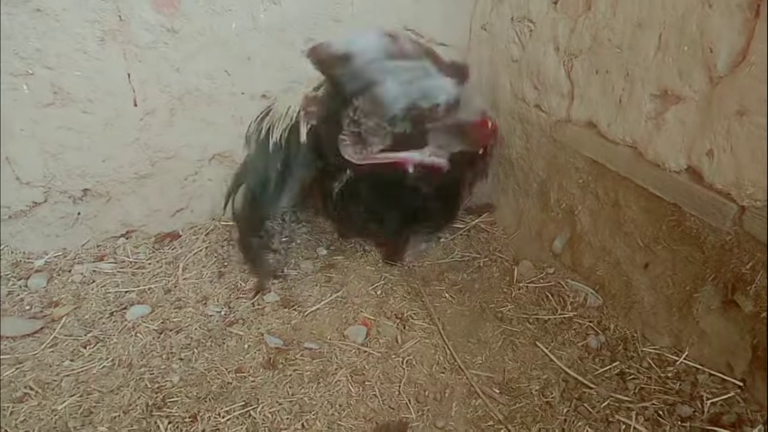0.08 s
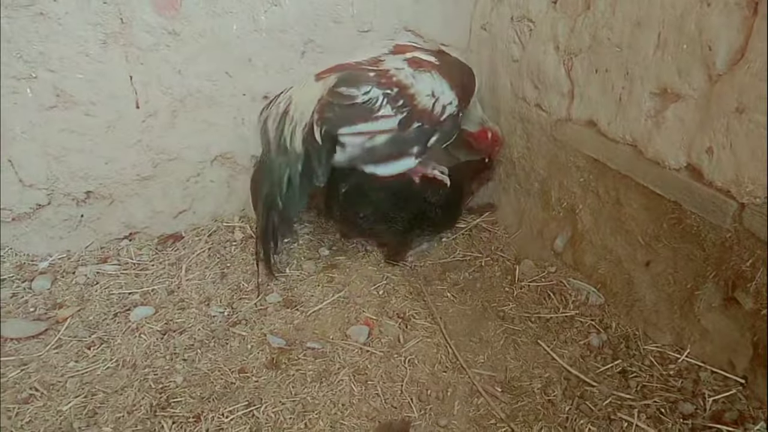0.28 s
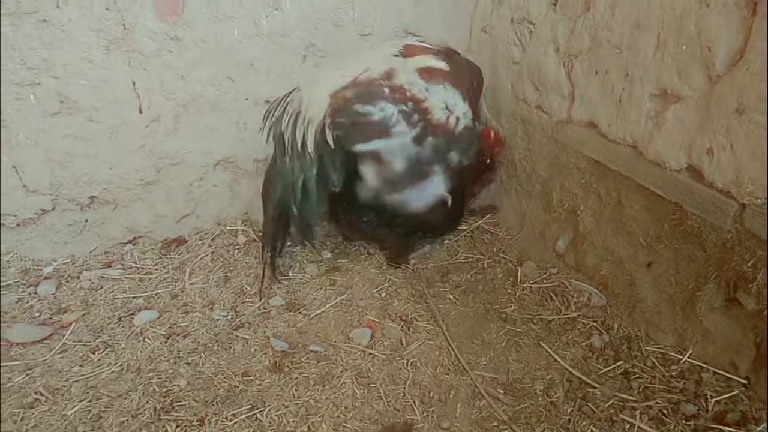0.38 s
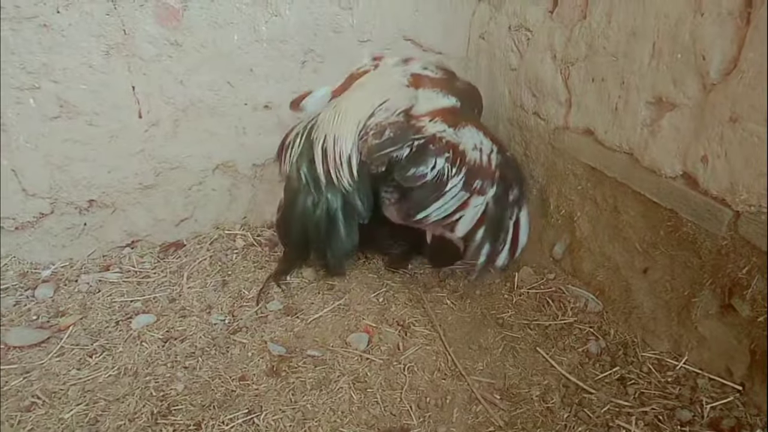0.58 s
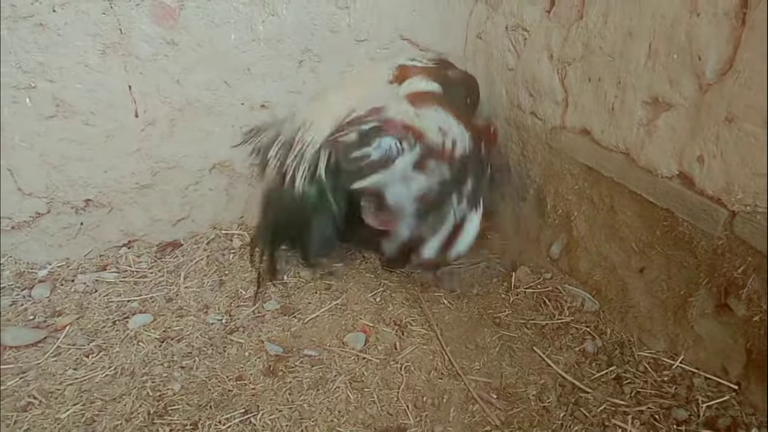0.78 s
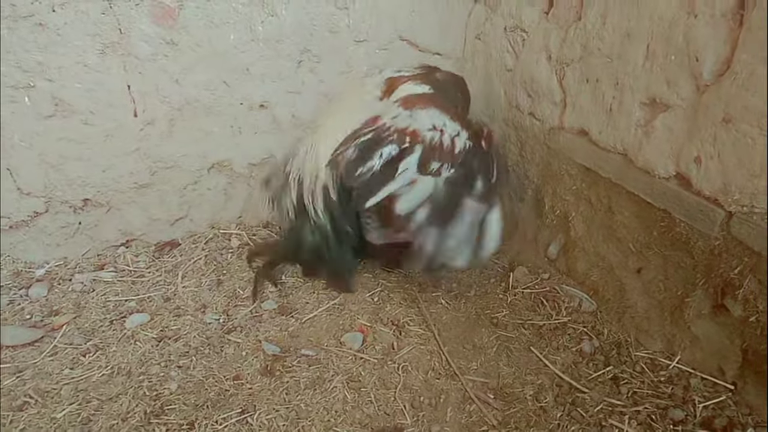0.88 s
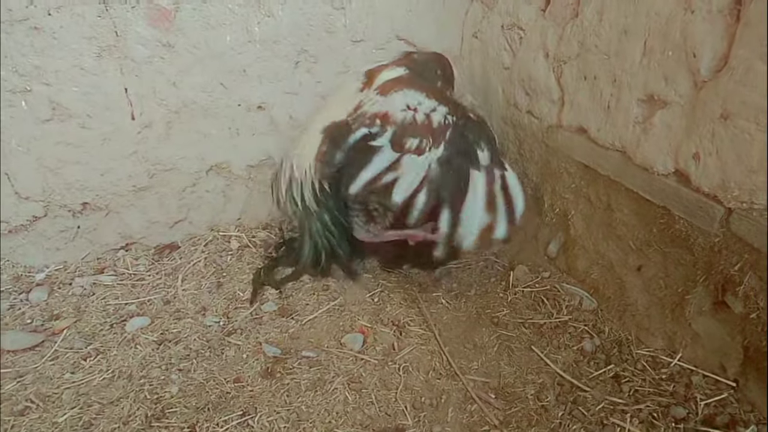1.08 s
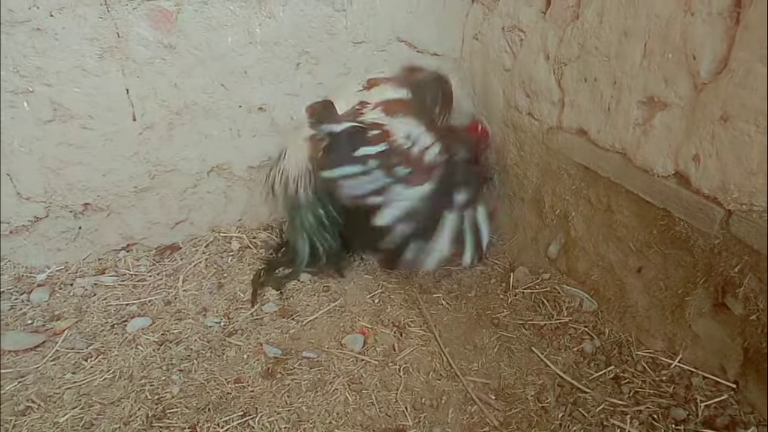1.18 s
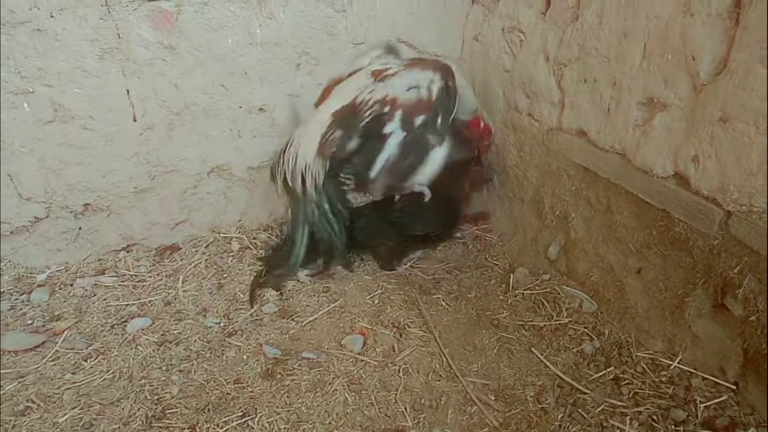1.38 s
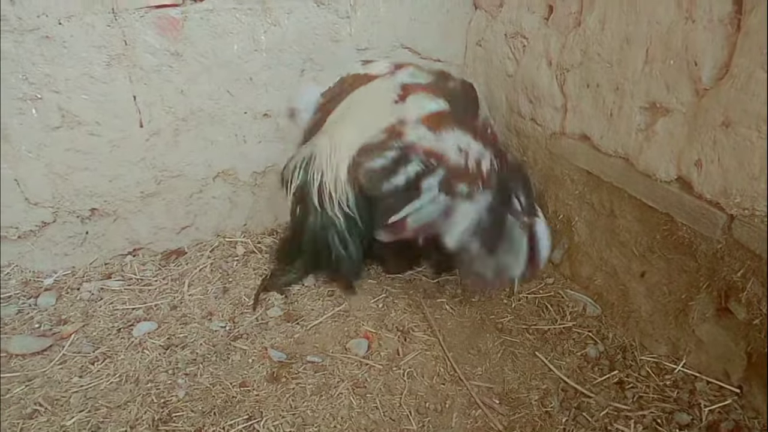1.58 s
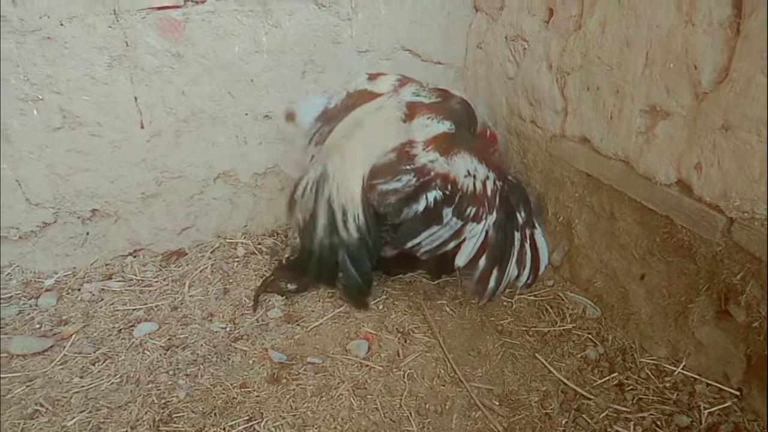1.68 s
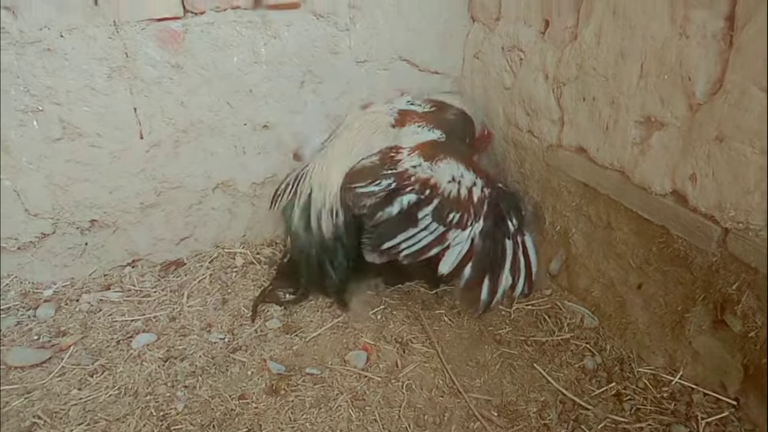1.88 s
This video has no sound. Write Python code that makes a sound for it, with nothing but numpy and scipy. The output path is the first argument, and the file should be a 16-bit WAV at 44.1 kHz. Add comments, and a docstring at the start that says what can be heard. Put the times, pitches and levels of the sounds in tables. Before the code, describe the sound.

A hen squawks three times, loud and hoarse, over scuffling wings and rustling feathers.

```python
"""A faint rustle and twitter, then three loud squawks from a hen pinned by a rooster in a pen's corner.
The membranes of her syrinx sing through her throat, cracking between clear and hoarse as a
second, lower pitch and puffs of breath join in. His wings push air and scrape over straw and wall,
feathers rub and tick, and a small bird whistles further off. The walls add a short reverb."""
import sys
import numpy as np
from scipy import signal
from scipy.fft import rfft, irfft
from scipy.io import wavfile
from scipy.ndimage import uniform_filter1d

SR = 44100
rng = np.random.default_rng(int(sys.argv[2]) if len(sys.argv) > 2 else 0)


def to_wav(s):
    """Save 16-bit WAV."""
    ch = np.atleast_2d(s).T  # columns
    pcm = np.round(np.clip(ch, -1, 1) * 32767)  # PCM
    wavfile.write(sys.argv[1], SR, pcm.astype(np.int16))


N = 83790

# the squawks: t/s, pitch/Hz, fundamental level/dB, overtone level/dB, treble level/dB, roughness/0-1
SQUAWK_1 = [(.188, 620, -54.5, -60.5, -80, 0.45), (.215, 658, -33.5, -35, -46, 0.3),
            (.228, 696, -31, -54.5, -49, 0.47), (.248, 793.5, -30.5, -32.5, -52, 0.71),
            (.28, 837, -36.5, -32.5, -40, 0.46), (.308, 819, -35.5, -28, -41, 0),
            (.334, 835.7, -39, -34.5, -40.5, 0.22), (.36, 809.3, -34.5, -26, -47, 0),
            (.384, 805, -41.5, -30, -51, 0.15), (.406, 808.7, -31, -35.5, -44, 0.9),
            (.45, 788, -67.5, -49, -56.5, 0.9), (.51, 782, -61, -65, -60, 0)]
SQUAWK_2 = [(0.524, 690, -43.5, -42.5, -52.5, 0.2), (0.559, 744.2, -22.5, -39, -44.5, 0.1),
            (0.574, 887.5, -47, -33.5, -44.5, 0.54), (0.601, 912, -42, -34.5, -40.5, 0.19),
            (0.644, 835, -27.5, -35, -41.5, 0.79), (0.673, 805.7, -38, -47, -48, 0.96),
            (0.696, 706.8, -41.5, -32, -48, 0.23), (0.735, 725.6, -24.5, -39, -41, 0.12),
            (0.762, 745, -23, -38.5, -50, 0.063), (0.781, 857.2, -41, -33, -31, 0.46),
            (.808, 888.8, -36.5, -32.5, -35.5, 0.1), (0.873, 888.6, -31.5, -32, -34.5, 0.26),
            (0.941, 870.3, -36.5, -36, -33, 0.1), (0.999, 848, -36, -27.5, -25, 0.13),
            (1.034, 835.6, -43.5, -35, -48.5, 0.34), (1.043, 758.6, -36, -26.5, -61, 0.56),
            (1.084, 770, -60, -44.5, -52.5, 0.7), (1.141, 796, -44, -61, -72, 0.66)]
SQUAWK_3 = [(1.135, 618, -61, -45, -53, 0.22), (1.187, 676.8, -38, -35, -47.5, 0.86),
            (1.227, 762, -33, -36, -45, 0.91), (1.283, 810, -34, -33, -45.5, 0.54),
            (1.329, 796.3, -26.5, -33, -46, 0.058), (1.378, 779.5, -31.5, -33.5, -56, 0.03),
            (1.401, 727.2, -30.5, -42.5, -53.5, 0.03), (1.477, 715.6, -32.5, -35.5, -59, 0.02),
            (1.496, 678, -31.5, -40, -45, 0.025), (1.52, 674.4, -27, -42.5, -50, 0.025),
            (1.536, 634, -38, -38, -63, 0.05), (1.634, 557.6, -45, -39, -53, 0.11),
            (1.779, 497.4, -64, -65, -82, 0.45)]
# cracks in the voice, where the pitch jumps: t/s
CRACKS = [.563, .772, 1.388, 1.487, 1.523]
# throat colour of the clear voice and of the hoarse breath: f/Hz, level/dB
THROAT_EQ = [(450, 5), (750, -15), (1150, 5), (1420, 8.5), (1680, 10), (1950, 4.5), (2300, 11),
             (2650, -1.5), (3100, -8.5), (3480, 2), (3750, -10.5), (4300, -25.5), (5300, -25.5),
             (7000, -30), (8300, -36.5), (10000, -28.5), (12000, -46), (15000, -37.5)]
RASP_EQ = [(200, -62.5), (420, -15), (720, 15), (1000, -14), (1250, -9.5), (1650, -0.5), (2000, -7),
           (2330, 0.5), (3000, -7.5), (3470, 28), (3850, -46), (6200, -1.5), (8000, -27), (15000, -64)]
# weight of the roughness in the fundamental, overtones and treble
RASP_SHARE = [0.45, 1.0, 1.11]
# which overtone rings most at each moment: t/s, f/Hz
RINGING_OVERTONE = [(.22, 1940), (.26, 1577), (.62, 1570), (.72, 1443), (.81, 1930), (1.01, 1720),
                    (1.045, 2330), (1.26, 2230), (1.35, 1505), (1.46, 1503), (1.5, 2124), (1.58, 1757),
                    (1.7, 1643)]
# overtones flare as the beak opening tunes in on them: t/s, half-width/s, f/Hz, boost/dB
BEAK_FLARES = [(0.345, 0.17, 7030, 10.5), (0.61, 0.053, 9450, 11.5), (0.844, 0.078, 5346, 10.5),
               (1, 0.041, 3400, 10), (1.515, 0.018, 3370, 6), (1.617, 0.032, 2348, 18)]
# slapback off the wall: delay/s, level/dB
SLAPBACK = [(.0175, -12)]
# wing pushes of air: t/s, half-width/s, level/dB
PUSHES = [(.01, 0.072, -54), (0.882, 0.0088, -44.5), (1.2, 0.038, -56.5), (1.456, 0.049, -45)]
# wing scrapes: t/s, length/s, level/dB
SCRAPES = [(0.938, 0.092, -33), (1.019, 0.048, -43), (1.292, .04, -32)]
# fader curve of the feather rustle: t/s, level/dB
RUSTLE_FADER = [(0, -50), (.17, -63.5), (.3, -63.5), (.46, -63.5), (.57, -54.5), (.74, -51), (.86, -52.5),
                (1.07, -61), (1.18, -53.5), (1.51, -53), (1.75, -61.5)]
# quill flicks: t/s, level/dB
FLICKS = [(.546, -55), (.829, -53), (.865, -48), (1.492, -54), (1.639, -55)]
# small bird's notes: t/s, length/s, start f/Hz, end f/Hz, level/dB, buzz/0-1
TWEETS = [(0.036, 0.009, 5660, 5100, -50.5, .4), (0.048, 0.064, 2330, 3600, -64, 0),
          (.1, 0.018, 3190, 4280, -52, 0.35), (1.242, 0.033, 5600, 5200, -51.5, 0.52),
          (1.516, 0.13, 5300, 4660, -56, 1), (1.785, 0.031, 5500, 5400, -53, 0.8),
          (1.818, 0.05, 2470, 3820, -58.5, 0.16)]
# colours of the pushes, scrapes, rustle, flicks and still air: f/Hz, level/dB
PUSH_EQ = [(25, -39), (60, -14), (150, 4.5), (310, -1.5), (520, -8.5), (4000, -65)]
SCRAPE_EQ = [(100, -32), (220, -15), (330, -4), (1200, 2.5), (2700, -11.5), (4500, -11), (6000, -17),
             (7300, -36.5), (8500, -22.5), (10000, -58)]
RUSTLE_EQ = [(200, -2), (1000, -5), (5800, 8), (7400, -6.5), (10500, -4.5), (14000, 3.5)]
FLICK_EQ = [(3000, -16), (14000, -11)]
AIR_EQ = [(30, -39), (62, 7.5), (200, -5), (500, -9.5), (5500, -14.5), (7500, -73.5), (15500, -42)]
# reverb time of the pen: f/Hz, t60/s
PEN_DECAY = [(100, 0.17), (2500, 0.31), (15000, 0.055)]

TIME = np.arange(N) / SR
EASE_SAMPLES = int(.009 * SR)  # smoothing of the voice's controls


def squawk(rows):
    """One side of the syrinx sings; with hoarseness the other side and puffs of breath join in."""
    start = rows[0][0]
    t = np.arange(start, rows[-1][0], 1 / SR)
    n = len(t)
    _, *levels, rough = uniform_filter1d(follow(rows, t), EASE_SAMPLES, axis=1, mode="nearest")
    hz, rough = cracking_pitch(rows, t), np.clip(rough, 0, .95)
    upper_side, lower_side = membrane(t, hz, rough), membrane(t, hz * .97, rough)
    lower_share = np.clip(rough ** 1.5, 0, .8)
    cycle = np.cumsum(hz) / SR % 1
    puffs = rfft(rng.standard_normal(N)[:n] * (.36 + np.exp(-cycle / .04)))  # one puff a cycle
    bins, voice = np.fft.rfftfreq(n, 1 / SR), 0
    for upper, lower, band, db, share in zip(upper_side, lower_side, registers(bins), levels, RASP_SHARE):
        tone = crossfade(upper, lower, lower_share)
        breath = unit_rms(irfft(puffs * band * amp(eq_at(RASP_EQ, bins)), n))
        hoarse = np.clip(rough * share, 0, 1)
        shimmer = 1 + (.05 + .16 * rough) * wander(n, rate_hz=93)
        voice += amp(db) * shimmer * crossfade(tone, breath, hoarse)
    return start, voice * tremor(t) * signal.windows.tukey(n, .03)


def membrane(t, hz, rough, ring_db=15, ring_width_hz=84, flare_width=.09):
    """A membrane's harmonics by register, coloured by throat and beak; one overtone rings out."""
    jitter = (.0015 + .02765 * rough) * wander(len(hz), rate_hz=150)
    cycles = np.cumsum(hz * (1 + jitter)) / SR
    k = np.arange(1, 20)[:, None]
    partial_hz = k * hz
    partials = np.cos(2 * np.pi * (k * cycles + rng.random(k.shape)))
    flutter_db = (1.5 + 5 * rough) * (k > 1)
    partials *= amp(flutter_db * flutter(t, count=len(k)))
    ring = ring_db * np.exp(-((partial_hz - follow(RINGING_OVERTONE, t)[0]) / ring_width_hz) ** 2)
    flare = sum(db * np.exp(-((t - s) / width) ** 2 - ((partial_hz / f - 1) / flare_width) ** 2)
                for s, width, f, db in BEAK_FLARES)
    colour = amp(eq_at(THROAT_EQ, partial_hz) + ring + flare)
    weights = [band * colour for band in registers(partial_hz)]
    return [(w * partials).sum(0) / np.sqrt((w ** 2).sum(0) / 2 + 1e-12) for w in weights]


def cracking_pitch(rows, t):
    """The pitch glides from point to point, but holds and jumps across a crack."""
    s, pitch = np.transpose(rows)[:2]
    hz, segment = np.interp(t, s, pitch), np.searchsorted(s, t)
    for at in CRACKS:
        i = np.searchsorted(s, at)
        if 0 < i < len(s):
            hz = np.where(segment == i, np.where(t < at, pitch[i - 1], pitch[i]), hz)
    return uniform_filter1d(hz, EASE_SAMPLES, mode="nearest")


def flutter(t, count, rate_hz=60):
    """A quick random wobble within -1 to 1, separate for each partial."""
    steps = np.arange(0, N / SR, 1 / (2 * rate_hz))
    return np.tanh([np.interp(t, steps, row) for row in rng.standard_normal((count, len(steps)))])


def tremor(t, at_s=.86, width_s=.07, rate_hz=40.76, depth=.36):
    """A brief shudder in the level of the second squawk."""
    swell = np.exp(-((t - at_s) / width_s) ** 2)
    return 1 + depth * swell * np.cos(2 * np.pi * rate_hz * (t - at_s))


def registers(hz, crossovers_hz=(945, 2580)):
    """Three-way crossover: fundamental, overtones and treble."""
    low, high = (1 / (1 + (hz / edge) ** 30) for edge in crossovers_hz)
    return low, high - low, 1 - high


def wing_pushes():
    """The rooster's wings shove air in soft, low whoomphs."""
    level = sum(amp(db) * np.exp(-.5 * ((TIME - s) / width) ** 2) for s, width, db in PUSHES)
    return level * coloured(grains(spread_db=5.5, rate_hz=23), PUSH_EQ)


def wing_scrapes(attack_s=.023, release_s=.0049):
    """Stiff wing feathers drag over straw and wall."""
    level = 0
    for s, length, db in SCRAPES:
        attack = np.clip((TIME - s) / attack_s, 0, 1)
        release = np.exp(-np.maximum(TIME - s - length, 0) / release_s)
        level += amp(db) * attack * release
    return level * coloured(grains(spread_db=1.5, rate_hz=450), SCRAPE_EQ)


def rustle(ticks_per_s=210):
    """Plumage rubs on plumage: a grainy hiss, with ticks as single barbs snap free."""
    level = amp(follow(RUSTLE_FADER, TIME)[0])
    ticks = 5.1 * rng.standard_normal(N) * (rng.random(N) < ticks_per_s / SR)
    return level * coloured(grains(spread_db=1.5, rate_hz=140) + ticks, RUSTLE_EQ)


def quill_flicks(decay_s=.0047):
    """Quills flick past one another with crisp ticks."""
    level = sum(amp(db) * (TIME >= s) * np.exp(-abs(TIME - s) / decay_s) for s, db in FLICKS)
    return level * coloured(rng.standard_normal(N), FLICK_EQ)


def tweet(s, length, start_hz, end_hz, db, buzz, buzz_depth_hz=570):
    """The small bird's gliding whistle, blurred by a fast pitch wobble."""
    n = int(length * SR)
    hz = np.linspace(start_hz, end_hz, n) + buzz * buzz_depth_hz * wander(n, rate_hz=610)
    whistle = np.sin(2 * np.pi * np.cumsum(hz) / SR)
    return s, amp(db) * unit_rms(signal.windows.tukey(n, .6) * whistle)


def slapback(x):
    """The near wall throws the voice back."""
    return sum(amp(db) * np.interp(TIME - delay, TIME, x, left=0) for delay, db in SLAPBACK)


def pen_reverb(x, predelay_s=.004):
    """A short, dense tail between plastered walls."""
    taps = rng.standard_normal(SR // 2) * (np.arange(SR // 2) > predelay_s * SR)
    hz, t, spectrum = signal.stft(taps, SR, nperseg=256)
    decay = amp(-60 * t / eq_at(PEN_DECAY, hz)[:, None])
    tail = signal.istft(spectrum * decay, SR, nperseg=256)[1]
    return signal.fftconvolve(x, tail / np.linalg.norm(tail))[:N]


def still_air(level_db=-66):
    """A quiet bed of rumble and hiss."""
    return amp(level_db) * coloured(rng.standard_normal(N), AIR_EQ)


def grains(spread_db, rate_hz):
    """Noise in clumps, as of barbs and straws slipping."""
    return rng.standard_normal(N) * amp(spread_db * wander(N, rate_hz))


def wander(size, rate_hz):
    """Smooth random modulation, rms near 1."""
    hz = np.fft.rfftfreq(N, 1 / SR)
    return unit_rms(irfft(rfft(rng.standard_normal(N)) / (1 + (hz / rate_hz) ** 4), N))[:size]


def coloured(x, eq):
    """Applies an EQ curve and normalises to rms 1."""
    hz = np.fft.rfftfreq(len(x), 1 / SR)
    return unit_rms(irfft(rfft(x) * amp(eq_at(eq, hz)), len(x)))


def eq_at(points, hz):
    """Reads a curve on a log-frequency axis."""
    f, value = np.transpose(points)
    return np.interp(np.log(hz + 1), np.log(f + 1), value)


def follow(rows, t):
    """Reads each automation lane at times t."""
    s, *lanes = np.transpose(rows)
    return [np.interp(t, s, lane) for lane in lanes]


def crossfade(a, b, share):
    """Equal-power blend from a to b."""
    return np.sqrt(1 - share ** 2) * a + share * b


def amp(db):
    """Decibels to gain."""
    return 10 ** (np.asarray(db) / 20)


def unit_rms(x):
    """Normalises to rms 1."""
    return x / np.sqrt(np.mean(x ** 2) + 1e-20)


def add(mix, s, sound):
    """Mixes a sound in at time s."""
    part = mix[max(round(s * SR), 0):][:len(sound)]
    part += sound[:len(part)]


def scene():
    """Mono mix: hen up front, then wings, feathers and small bird, over reverb and still air."""
    hen, bird = np.zeros(N), np.zeros(N)
    for rows in (SQUAWK_1, SQUAWK_2, SQUAWK_3):
        add(hen, *squawk(rows))
    for row in TWEETS:
        add(bird, *tweet(*row))
    wings = wing_pushes() + wing_scrapes()
    reverb_send = amp(-9) * (hen + wings) + amp(-10) * bird
    ambience = pen_reverb(reverb_send) + still_air()
    return (hen + slapback(hen) + wings + rustle() + quill_flicks() + bird + ambience)[None]


def record(dry):
    """A steep high cut on the whole mix."""
    high_cut = signal.firwin(511, cutoff=15800, window=("kaiser", 9), fs=SR)
    return signal.oaconvolve(dry, high_cut[None], "same")


dry = scene()
out = record(dry)
to_wav(out)
```